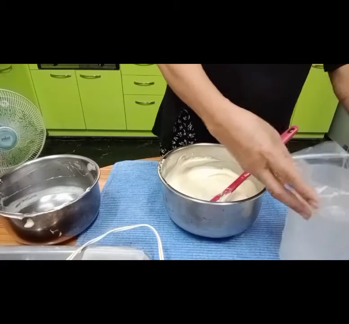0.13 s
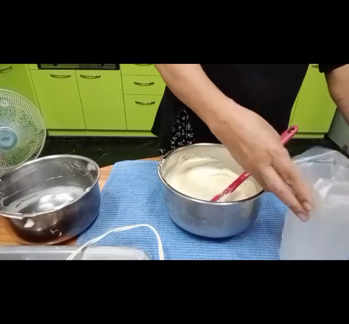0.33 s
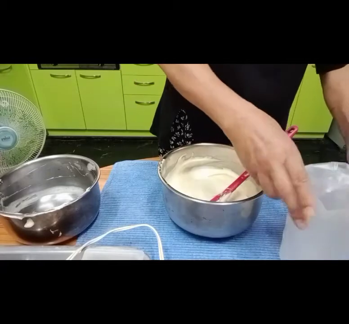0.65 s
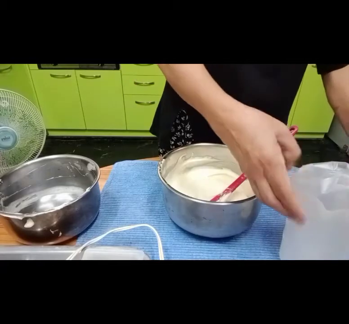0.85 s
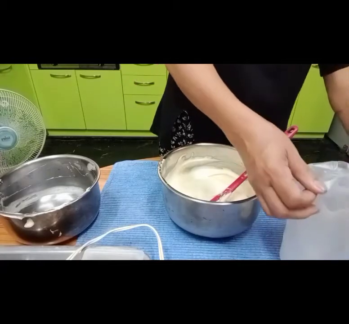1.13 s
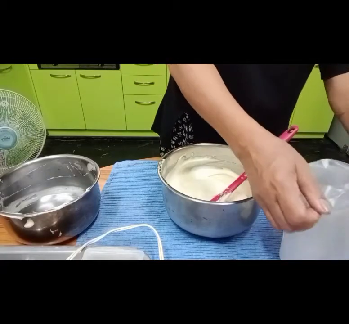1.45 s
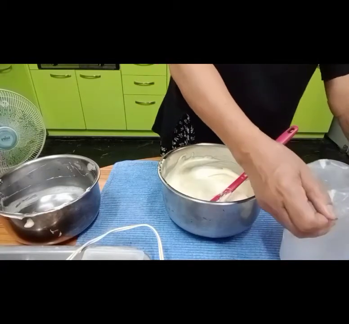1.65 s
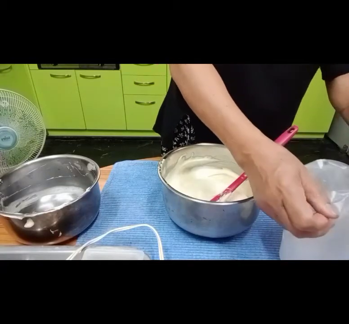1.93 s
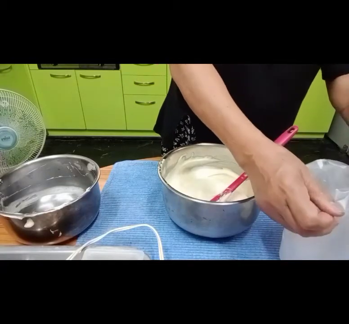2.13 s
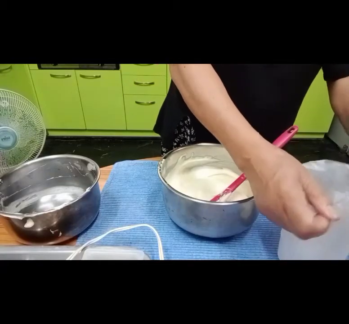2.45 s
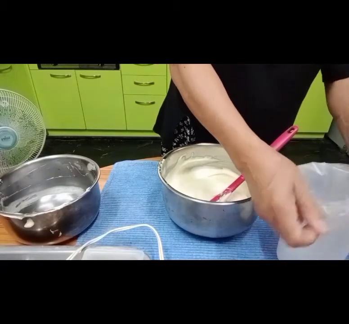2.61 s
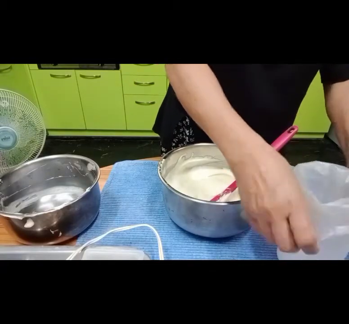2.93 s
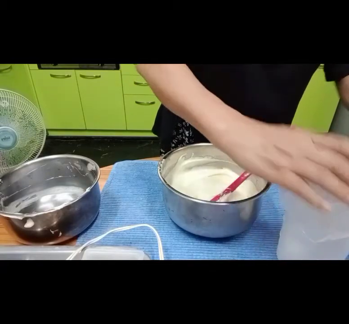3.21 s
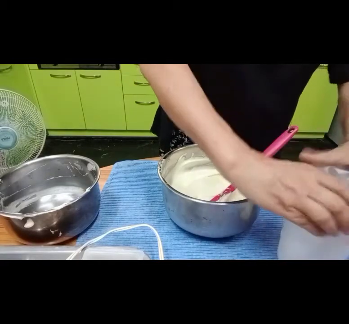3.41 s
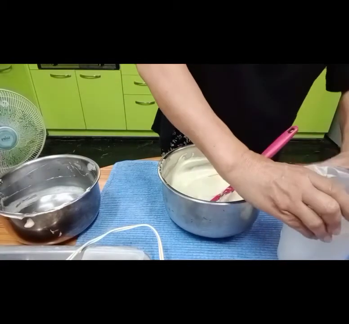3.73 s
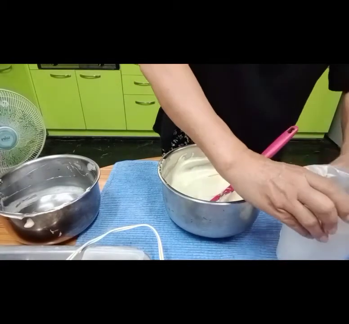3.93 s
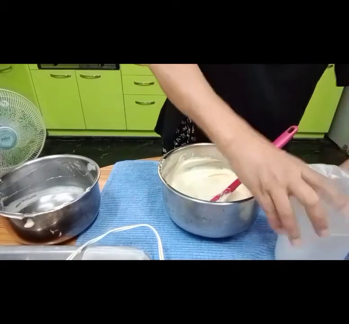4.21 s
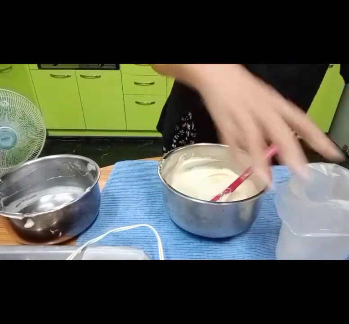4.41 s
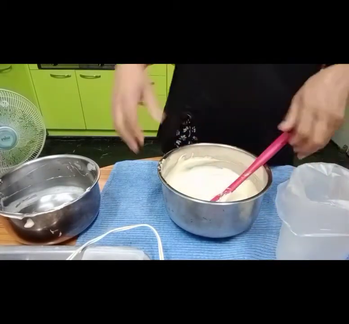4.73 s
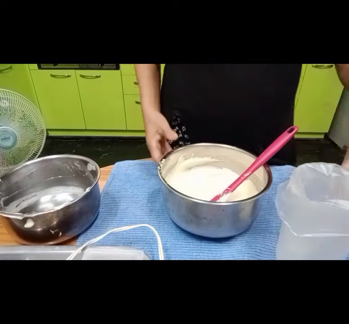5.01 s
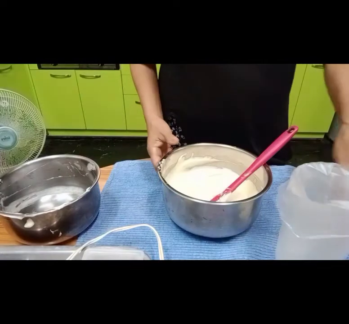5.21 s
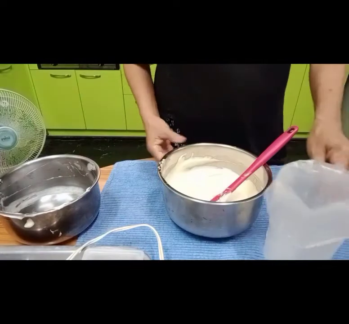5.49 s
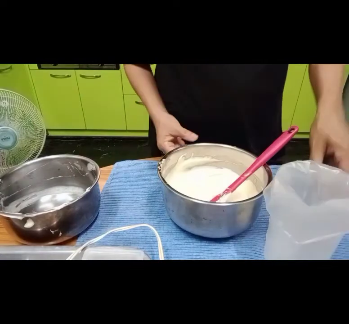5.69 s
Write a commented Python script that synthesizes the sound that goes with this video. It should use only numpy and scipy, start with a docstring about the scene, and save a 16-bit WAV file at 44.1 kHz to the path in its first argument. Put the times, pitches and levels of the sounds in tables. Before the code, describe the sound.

Close view of hands working a clear bag in a plastic jug. A soft thud opens, overlapping bright, irregular film crinkle with hollow resonance. Handling eases to scattered dry ticks, surges again twice, then stops. Near silence follows, with a few faint rustles, a barely audible metal touch and steady faint fan noise. Short, hard-surfaced kitchen echo; no speech.

```python
"""In a small kitchen, a plastic jug lined with a clear piping bag lands on a cloth-covered table with a dull thump.
A hand folds the bag over the rim in short strokes: buckling creases crinkle and snap as coloured noise bursts,
film slides with a hiss, and moving resonances make the air in the jug ring along.
Damped sines sound the jug, popping panels and a bowl touched by fingers; filtered noise gives scuffs and rumble.
A fan hums faintly as steady coloured noise, and decaying noise echoes give the room."""
import sys
import numpy as np
from scipy import signal
from scipy.fft import rfft, irfft
from scipy.io import wavfile
from scipy.ndimage import uniform_filter1d

SR = 44100
rng = np.random.default_rng(int(sys.argv[2]) if len(sys.argv) > 2 else 0)


def to_wav(sig):
    """Store sig (one row per channel, or 1-D mono) as 16-bit WAV at the path in sys.argv[1].

    Samples outside -1..1 are clipped; the rate is SR.
    """
    pcm = np.clip(np.atleast_2d(sig), -1, 1) * 32767
    pcm = np.round(pcm).astype(np.int16)
    wavfile.write(sys.argv[1], SR, pcm.T)  # frames by channels


N = 258426
TIME = np.arange(N) / SR  # s
CUTOFF_HZ = 15550
CREASE_SPREAD_DB = 6


# long folds of the film over the rim, one curve each: time_s, crisp_crinkle_db, hollow_flexing_db (both relative)
FOLDS = [
    [(0.0, -27.5, -31), (0.076, -42, -41), (0.1, -43, -79.5), (0.15, -32, -45.5), (0.166, -36.5, -36.5),
     (0.194, -46.5, -62.5), (0.282, -24, -27.5), (0.304, -32, -33), (0.52, -21.5, -26.5),
     (0.562, -30.5, -35), (0.74, -45, -49), (0.79, -75, -62)],
    [(2.26, -46, -52), (2.404, -28, -32.5), (2.476, -36, -36.5), (2.5, -23, -25), (2.532, -39, -46),
     (2.684, -20, -20.5), (2.81, -35, -36.5), (2.856, -21.5, -27), (2.978, -44.5, -49.5),
     (2.988, -27.5, -45), (3.056, -59.5, -44.5), (3.09, -62, -97)],
    [(3.29, -55, -53.5), (3.376, -25.5, -32.5), (3.454, -31.5, -38), (3.51, -32.5, -38), (3.542, -28, -43),
     (3.72, -34.5, -35.5), (3.842, -38.5, -46), (3.866, -30.5, -39), (3.874, -32, -38.5),
     (3.972, -42, -41.5), (4.268, -35, -47.5), (4.33, -79, -69)],
]
# short tugs and brushes at the film: start_s, length_s, crisp_crinkle_db, hollow_against_crisp_db
TUGS = [(0.789, 0.078, -52.5, 3.5), (0.894, 0.19, -66, -13), (0.958, 0.013, -55, 2),
        (1.038, 0.027, -44.5, -6), (1.104, 0.17, -46.5, 2), (1.31, 0.066, -52.5, 0.5),
        (1.431, 0.008, -56.5, -3), (1.466, 0.061, -45.5, 0), (1.59, 0.12, -42, -2),
        (1.791, 0.031, -48.5, 2), (1.963, 0.034, -36, 3), (2.012, 0.12, -42.5, 1.5),
        (4.326, 0.22, -68.5, -2.5), (5.099, 0.092, -55.5, -6.5), (5.214, 0.08, -59, -10),
        (5.655, 0.033, -65.5, -25)]


def hand(fold_hollow_db=0.5, settle_db=-27, settle_t60=.55):
    """Work input: powers of folds and tugs add, and the creases go on settling after the hand has eased."""
    power = np.zeros((2, N))
    for fold in FOLDS:
        crisp_db, flex_db = in_time(fold)
        during_fold = (TIME >= fold[0][0]) * (TIME <= fold[-1][0])
        power += from_db([crisp_db, flex_db + fold_hollow_db]) ** 2 * during_fold
    for s, length, db, hollow_db in TUGS:
        power += from_db([[db], [db + hollow_db]]) ** 2 * tug(s, length) ** 2
    steady_gain = fade(np.ones(N), settle_t60)[-1]
    settling = from_db(settle_db) ** 2 * fade(power, settle_t60) / steady_gain
    return 10 * np.log10(power + settling + 1e-12)


def tug(s, length, attack_s=0.0052, swell_db=5.5, release_t60=0.13):
    """Tension envelope: a tug takes hold, swells as the film tightens and dies away exponentially."""
    t = TIME - s
    grip = (1 + np.tanh(t / (2 * attack_s))) / 2
    slack = np.clip(1 - t / length, 0, 1)
    release_db = -60 * np.maximum(t - length, 0) / release_t60
    return grip * from_db(-swell_db * (slack - .5) + release_db)


def crinkle(crisp_db, flex_db, chance=.38, crowding=.3, even_s=0.029, gain_db=-4.0, hollow_db=0.0,
            facet_hz=4800, octaves=.75, hold_db=2.0, count=11000):
    """Random buckling: creases give way at chance moments, more of them the harder the hand works."""
    at = rng.integers(0, N, count)
    size, scatter = np.clip(rng.standard_normal((2, count)), -2, 2)
    # some creases slide open softly, others tick
    softness = 2 ** rng.uniform(-1, 1, (count, 1))
    noise = rng.standard_normal((count, 1024))
    gives = rng.random(count) < chance * from_db(crowding * (crisp_db[at] + 35))
    at, size, scatter, softness, noise = (v[gives] for v in (at, size, scatter, softness, noise))
    s = TIME[at]
    # the creases of one moment share the energy that the hand puts in
    crease_db = CREASE_SPREAD_DB * size
    shared = uniform_filter1d(impulses(s, from_db(crease_db) ** 2), max(int(even_s * SR), 2))[at]
    energy_db = crease_db - 10 * np.log10(shared + 1e-9) + crisp_db[at] + gain_db
    # the film holds still while tension builds towards a snap
    from_hold = s[:, None] - np.array(SNAPS)[:, 0] + .004
    holding = np.exp(-(from_hold / .007) ** 2).max(axis=1)
    # neighbouring creases lie in the same fold and ring at similar pitches
    pitch_hz = facet_hz * 2 ** (octaves * (scatter + wander(s, per_s=30) / 2))
    return buckles(noise, s, energy_db - hold_db * holding, (flex_db - crisp_db)[at] + hollow_db, pitch_hz,
                   t60=0.02 * softness, rise_s=0.00076 * softness ** 2, facet_db=12, facet_q=23.0)


# single creases, from loud snaps to faint dry ticks: start_s, level_db (relative), facet_pitch_hz,
# hollow_db (share below about 2 kHz against the rest)
SNAPS = [(0.119, -23.5, 9500, -16.5), (0.1472, -15.5, 3240, -2.5), (0.2295, -20.5, 2200, 6),
         (0.251, -13, 2370, -11.5), (0.276, -11, 5070, -12), (0.394, -8, 6600, -3.5),
         (0.5137, -6.5, 6700, -6.5), (0.6203, -17, 7040, -7), (0.7322, -26, 7160, -15),
         (0.8018, -34, 7100, -28), (0.8711, -22, 3550, -45), (0.9842, -35.5, 3500, 0.5),
         (1.0599, -20.5, 5700, -39), (1.1298, -25, 3920, -15), (1.1502, -28, 3040, -12),
         (1.193, -28, 3070, -1), (1.248, -26, 3030, -9), (1.3421, -25.5, 8800, -15),
         (1.3864, -37, 3050, 7.5), (1.5, -19, 10000, -2.5), (1.6368, -26.5, 8550, -3),
         (1.687, -24.5, 5450, -4), (1.716, -24.5, 2400, 0.5), (1.8076, -21, 3100, -9.5),
         (1.848, -28.5, 3300, 10), (1.9859, -18, 1490, 2.5), (1.9955, -18, 5530, -3),
         (2.069, -24, 3210, -5), (2.1255, -12, 5100, -9), (2.1618, -18, 8700, -7), (2.2727, -28, 5500, -18),
         (2.3395, -28.5, 3080, -2), (2.397, -9.5, 3850, -8.5), (2.4591, -15.5, 7500, -11),
         (2.614, -12.5, 2520, -4), (2.698, -13.5, 3380, -1.5), (2.835, -11.5, 5700, -6.5),
         (2.9829, -18, 7250, -16), (3.3562, -21.5, 3080, -4), (3.379, -8, 6200, -4),
         (3.495, -6.5, 2960, -17), (3.505, -22, 3000, 11), (3.5675, -18, 3250, -5),
         (3.587, -11.5, 3920, -12), (3.6496, -19, 3060, -7), (3.7248, -13.5, 3450, 3.5),
         (3.8838, -18.5, 2470, -5), (3.93, -19.5, 5070, -12), (4.117, -23.5, 3030, -1),
         (4.1442, -19, 8700, -10), (4.1657, -17.5, 3760, -19), (4.2086, -20, 5480, -8),
         (4.5063, -43, 3230, -5), (4.6237, -35, 3520, -6), (5.1765, -30.5, 2250, -6.5),
         (5.252, -37.5, 5740, -10), (5.2831, -33, 5220, -9), (5.4797, -45, 5940, -10),
         (5.662, -41, 5610, -9), (5.6936, -43.5, 7560, -17)]


def snaps(gain_db=7.5, crack_db=0.5, herald_db=-9.0, herald_s=0.0064):
    """Snap-through instability: a crease gives a little, then all at once with a crack and brief shiver."""
    s, level_db, facet_hz, hollow_db = np.transpose(SNAPS)
    clicks = impulses(s + 0.00063, from_db(level_db + crack_db))
    crack = butter(clicks, [5000, 14000], "band", order=1)
    noise = rng.standard_normal((len(s), 2, 1024))
    herald_at = s - herald_s * rng.uniform(0.8, 1.3, len(s))
    herald = buckles(noise[:, 0], herald_at, level_db + herald_db, hollow_db, facet_hz,
                     t60=0.041, rise_s=0.0089, facet_db=6.0, facet_q=6.5)
    shiver = buckles(noise[:, 1], s + .0002, level_db + gain_db, hollow_db, facet_hz,
                     t60=.008, rise_s=0.0013, facet_db=12.0, facet_q=14.0)
    return crack + herald + shiver


def ticks(crisp_db, tick_db=-19.5, spread_db=4.5, follows=0.82, low_hz=2300, high_hz=10500, count=330):
    """Small-scale buckling: tiny creases flick over at their own pitches, standing out most in light handling."""
    at = rng.integers(0, N, count)
    spread = np.clip(rng.standard_normal(count), -2, 2)
    level_db = tick_db + follows * (crisp_db[at] + 36.0) + spread_db * spread
    pitch_hz = low_hz * (high_hz / low_hz) ** rng.random(count)
    noise = rng.standard_normal((count, 1024))
    return buckles(noise, TIME[at], level_db, np.full(count, -12.0), pitch_hz,
                   t60=0.0097, rise_s=0.0009, facet_db=12.5, facet_q=24.0)


# colour of crinkling film: frequency_hz, level_db (relative, per Hz)
FILM = [(120, -23), (280, -2.5), (450, 3), (700, 5), (1000, -0.2), (1700, -1.3), (2600, -1.8), (4300, -2.5),
        (7000, -6), (10000, -1.35), (11500, -3), (13200, -6.5), (14000, -10), (14900, 1.5)]


def buckles(noise, s, energy_db, hollow_db, facet_hz, t60, rise_s, facet_db, facet_q):
    """Impulsive radiation: each crease is a tiny noise burst coloured by the resonance of the facet beside it."""
    size = noise.shape[1]
    lead = size // 8
    t = np.maximum(np.arange(size) - lead, 0) / SR
    hz = np.maximum(np.arange(size // 2 + 1) * SR / size, 1)
    burst = noise * (1 - np.exp(-t / rise_s)) * from_db(-60 * t / t60)
    facet = 1 / (1 + 1j * facet_q * (hz / facet_hz[:, None] - facet_hz[:, None] / hz))
    colour = (1 + from_db(facet_db) * facet) * from_db(at_hz(FILM, hz)) * (hz < CUTOFF_HZ)
    spectra = rfft(burst) * colour
    spectra /= np.sqrt(np.mean(np.abs(spectra) ** 2, axis=1, keepdims=True))
    grains = irfft(spectra * from_db(hollow_db[:, None] * hollow_share(hz) + energy_db[:, None]))
    # add the overlapping grains at their places
    places = np.maximum(np.round(s * SR).astype(int), 0)[:, None] + np.arange(size)
    return np.bincount(places.ravel(), grains.ravel(), N + lead)[lead:N + lead]


def hollow_share(hz):
    """Radiation by size: 1 where whole panels of film flex, 0 where only sharp creases radiate."""
    return 1 / (1 + (hz / 2000) ** 4)


def slide(crisp_db, flex_db, gain_db=-14.0, hollow_db=1.5):
    """Sliding friction: film on film gives a fine hiss between the creases."""
    hiss = shaped(FILM)
    crisp = from_db(crisp_db) * butter(hiss, 2000, "high")
    hollow = from_db(flex_db + hollow_db) * butter(hiss, 1300, "low")
    return from_db(gain_db) * (crisp + hollow)


# changing level of the top treble of the bag against the rest: time_s, level_db
SHEEN = [(0, -1), (1.1, -0.5), (1.8, 2), (2.7, 0), (3.7, -7), (4.6, -2.5), (5.6, -2.5)]


def sheen(x, sheen_hz=9800):
    """Time-varying spectral tilt: the top treble of the bag is brighter at some times than at others."""
    top_db, = in_time(SHEEN)
    hz = np.arange(N // 2 + 1) * SR / N
    top = irfft(rfft(x) * (1 - 1 / (1 + (hz / sheen_hz) ** 8)), N)
    return x + (from_db(top_db) - 1) * top


# air modes of the jug, shifting as hand and film cover its mouth:
# time_s, low_mode_hz, low_boost_db, second_mode_hz, second_boost_db
JUG_AIR = [(.5, 469, 14.5, 1256, 16), (1.2, 478, 15.5, 1322, 19), (1.52, 452, 18.5, 1263, 20),
           (1.99, 528, 12, 1330, 14.5), (2.13, 514, 14, 1294, 18), (2.42, 452, 17, 1287, 17),
           (2.7, 458, 11.5, 1313, 17.5), (3.44, 441, 19, 1270, 17), (3.65, 445, 11.5, 1308, 15),
           (3.9, 455, -6, 1250, 14), (4.3, 460, 19.5, 1290, 21.5)]
# broad peaks and dips of the film over the jug: frequency_hz, width_hz, boost_db
RESONANCES = [(523.3, 4, 1.5), (1420, 360, 4), (2317, 250, 6.5), (3160, 480, 5.5), (4340, 340, -6.5),
              (5060, 830, 5), (5800, 410, 7.5), (5920, 620, -6), (7140, 320, 6.5), (7650, 670, 3.5),
              (7950, 360, -3), (9210, 1100, 5)]


def jug_air(x, low_width_hz=42, second_width_hz=80):
    """Cavity resonance: the air rings at two shifting pitches; the film over it adds a steady colour."""
    low_hz, low_db, second_hz, second_db = in_time(JUG_AIR)
    low = resonate(x * (from_db(low_db) - 1), low_hz, low_width_hz)
    second = resonate(x * (from_db(second_db) - 1), second_hz, second_width_hz)
    x = x + low + second
    for hz, width_hz, boost_db in RESONANCES:
        x = x + (from_db(boost_db) - 1) * resonate(x, hz, width_hz, size=N)
    return x


# a slack panel of film pops and sounds the air in the jug: start_s, level_db (relative)
POPS = [(0.159, -36), (0.232, -29.5), (2.497, -21), (3.860, -18), (3.918, -33), (4.014, -32),
        (4.078, -33.5), (5.109, -44.5)]


def pops(panel_hz=1370, air_hz=1285, panel_t60=.014, air_t60=.035):
    """Coupled resonators: a panel flips over and hands its swing to the second air mode of the jug."""
    s, level_db = np.transpose(POPS)
    panel = ring(impulses(s, from_db(level_db)), panel_hz, panel_t60)
    swing = ring(panel, air_hz, air_t60)
    return from_db(level_db.max()) * swing / np.abs(swing).max()


# the hand drags on the jug: centre_s, length_s (standard deviation), level_db (relative)
DRAGS = [(0.48, 0.11, -42), (2.003, 0.041, -54), (2.429, 0.024, -50), (2.71, 0.025, -51.5),
         (3.442, 0.048, -58), (4.256, 0.029, -35.5)]


def drags(gain_db=-8.5):
    """Friction noise: short dull scuffs as the hand slides on the wall of the jug."""
    scuff = rms_one(butter(rng.standard_normal(N), [210, 660], "band", order=3))
    return from_db(gain_db) * swells(DRAGS) * scuff


# the base of the jug lands and rocks: start_s, level_db (relative)
LANDINGS = [(0.0, -12), (0.033, -20.5)]
# modes of the jug on the table: frequency_hz, level_db (relative), t60_s
THUMP_MODES = [(145, -11, 0.32), (162, 1, 0.069), (209.8, -12.5, .15), (327, -12, 0.17), (497, 2.5, 0.051),
               (467, -6.5, 0.17), (506, -23, 0.2), (630, -15, 0.41), (725, -38, .05)]


def thump(shudder_db=-18.0, shudder_t60=0.74):
    """Impact on damped modes: cloth softens the landing; jug and table ring low, and the table top shudders on."""
    s, level_db = np.transpose(LANDINGS)
    blows = impulses(s, from_db(level_db))
    body = sum(from_db(db) * ring(blows, hz, t60) for hz, db, t60 in THUMP_MODES)
    shudder = rms_one(butter(rng.standard_normal(N), [410, 630], "band", order=3))
    shudder = shudder * np.sqrt(fade(blows ** 2, shudder_t60))
    return butter(body, 140, "high", order=3) + from_db(shudder_db) * shudder


# fingers take hold of the steel bowl: start_s, level_db (relative)
BOWL_TOUCHES = [(5.125, -66), (5.177, -61)]
# modes of the steel bowl damped by batter: frequency_hz, level_db (relative), t60_s
BOWL_MODES = [(1240, -2, 0.13), (2280, -4, 0.2), (2450, -9, 0.1), (3240, 1, 0.09)]


def bowl():
    """Modal ringing: the bowl sounds faintly under the fingers as a sum of damped sines."""
    s, level_db = np.transpose(BOWL_TOUCHES)
    touches = impulses(s, from_db(level_db))
    return sum(from_db(db) * ring(touches, hz, t60) for hz, db, t60 in BOWL_MODES)


# the hand bumps jug and table: centre_s, length_s (standard deviation), rumble_db
BUMPS = [(.27, 0.0094, -52), (.525, 0.009, -49), (1.18, 0.15, -56), (3.675, 0.0084, -55),
         (3.99, 0.049, -55), (4.24, 0.044, -54), (5.77, 0.016, -61.5)]


def nudges(effort_db, rumble_db=-55.5, follows=0.19):
    """Structure-borne noise: the table rumbles softly with the working hand and swells at each bump."""
    working = from_db(rumble_db + follows * (effort_db - effort_db.max()))
    rumble = rms_one(butter(rng.standard_normal(N), [115, 220], "band"))
    return np.hypot(working, swells(BUMPS)) * rumble


# colour of the fan: frequency_hz, level_db (relative, per Hz)
FAN = [(30, -32), (70, -14), (118, -3), (175, -14), (260, -16), (700, -21), (1250, -18), (1600, -26),
       (4300, -32), (7000, -32), (8200, -37), (15000, -42)]


def fan_hum(level_db=-64.5):
    """Stationary broadband noise: the fan has a fixed spectrum and a steady level."""
    return from_db(level_db) * shaped(FAN)


# reverberation of the kitchen by band: lowest_hz, highest_hz, t60_s
ROOM_DECAY = [(107, 1500, 0.26), (1640, 7500, 0.22), (7990, 8200, 0.027)]


def kitchen(x, wet_db=-13.5, near_db=-9.5, near_hz=1800, near_t60=.035):
    """Reverberation: quick bright reflections from nearby hard surfaces, then the short tail of the room."""
    t = TIME[:SR // 2]
    tail = np.zeros(len(t))
    for low, high, t60 in ROOM_DECAY:
        tail += butter(rng.standard_normal(len(t)), [low, high], "band") * from_db(-60 * t / t60)
    tail *= t > .006
    near = butter(rng.standard_normal(len(t)) * from_db(-60 * t / near_t60) * (t > .001), near_hz, "high")
    echoes = from_db(wet_db) * tail / np.linalg.norm(tail) + from_db(near_db) * near / np.linalg.norm(near)
    return x + signal.fftconvolve(x, echoes)[:N]


def from_db(db):
    """Logarithmic level: decibels to amplitude gain."""
    return 10 ** (np.asarray(db) / 20)


def rms_one(x):
    """Power normalisation: scale to unit mean square."""
    return x / np.sqrt(np.mean(x ** 2) + 1e-20)


def in_time(rows):
    """Linear interpolation: each column of a curve at every sample."""
    s, *columns = np.transpose(rows)
    return [np.interp(TIME, s, c) for c in columns]


def at_hz(points, hz):
    """Logarithmic pitch scale: read a spectrum table on a log-frequency axis."""
    table_hz, level_db = np.array(points).T
    return np.interp(np.log(hz), np.log(table_hz), level_db)


def wander(s, per_s):
    """Slow random process: a smooth control read at times s."""
    return np.interp(s * per_s, np.arange(400), rng.standard_normal(400))


def swells(rows):
    """Gaussian envelopes: smooth pushes summed over rows of centre_s, length_s, level_db."""
    return sum(from_db(db) * np.exp(-((TIME - s) / length) ** 2 / 2) for s, length, db in rows)


def fade(energy, t60):
    """Exponential decay: energy falls 60 dB in t60 seconds."""
    return signal.lfilter([1], [1, -from_db(-120 / (t60 * SR))], energy + 1e-18)


def impulses(s, sizes):
    """Ideal impacts: clicks of given sizes at given times."""
    out = np.zeros(N)
    out[np.clip(np.round(np.asarray(s) * SR).astype(int), 0, N - 1)] = sizes
    return out


def ring(clicks, hz, t60):
    """Damped oscillator: a unit click sets a decaying sine of about height 1 ringing."""
    r, w = from_db(-60 / (t60 * SR)), 2 * np.pi * hz / SR
    return signal.lfilter([0, np.sin(w)], [1, -2 * r * np.cos(w), r * r], clicks + 1e-18)


def resonate(x, hz, width_hz, size=256):
    """Two-pole resonance: a band-pass of peak gain 1 whose centre may move, stepped block by block."""
    r, out, state = np.exp(-np.pi * width_hz / SR), np.zeros(N), np.zeros(2)
    w = np.broadcast_to(2 * np.pi * hz / SR, N)
    zeros = np.array([1, 0, -1]) * (1 - r * r) / 2
    for i in range(0, N, size):
        poles = [1, -2 * r * np.cos(w[i]), r * r]
        out[i:i + size], state = signal.lfilter(zeros, poles, x[i:i + size], zi=state)
    return out


def butter(x, hz, kind, order=2):
    """Band limiting: a causal Butterworth filter."""
    return signal.sosfilt(signal.butter(order, hz, kind, fs=SR, output="sos"), x + 1e-18)


def shaped(spectrum):
    """Spectral shaping: steady noise of a given colour and unit power."""
    hz = np.maximum(np.arange(N // 2 + 1) * SR / N, 1)
    return rms_one(irfft(rfft(rng.standard_normal(N)) * from_db(at_hz(spectrum, hz)), N))


def scene():
    """Superposition: bag, jug and bowl in the kitchen, with thump, rumble and fan added without echoes."""
    crisp_db, flex_db = hand()
    film = sheen(crinkle(crisp_db, flex_db) + slide(crisp_db, flex_db) + ticks(crisp_db) + snaps())
    bag = jug_air(film) + pops() + drags()
    return (kitchen(bag + bowl()) + thump() + nudges(crisp_db) + fan_hum())[None]


def record(dry):
    """Low-pass filtering: an elliptic filter cuts the top steeply."""
    return signal.sosfilt(signal.ellip(10, .2, 80, CUTOFF_HZ, fs=SR, output="sos"), dry)


dry = scene()
out = record(dry)
to_wav(out)
```